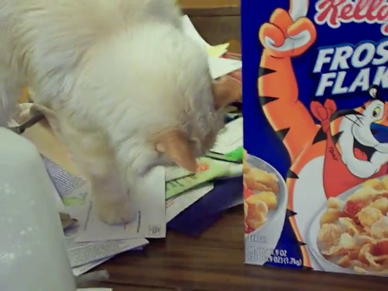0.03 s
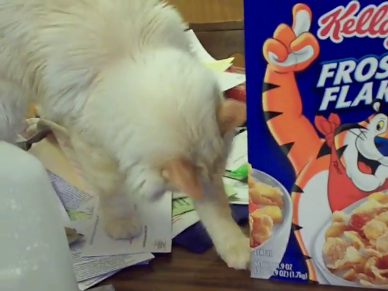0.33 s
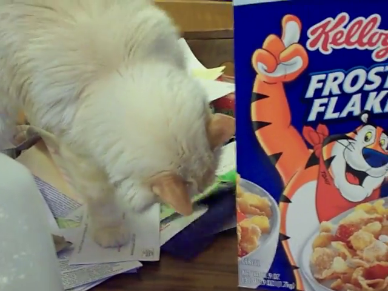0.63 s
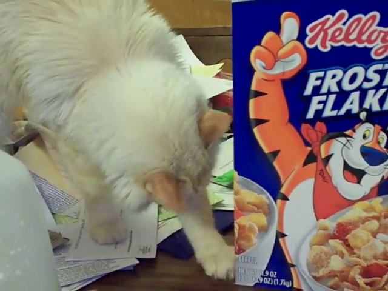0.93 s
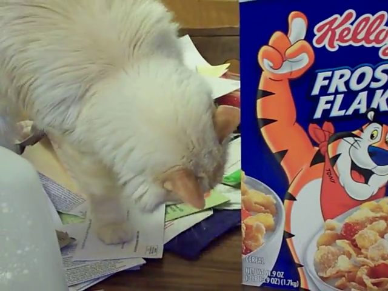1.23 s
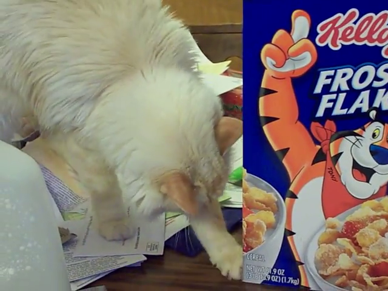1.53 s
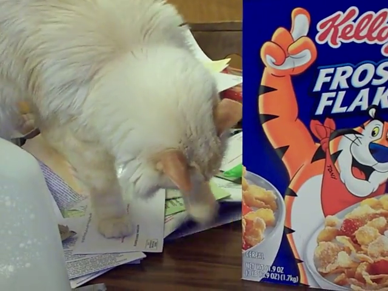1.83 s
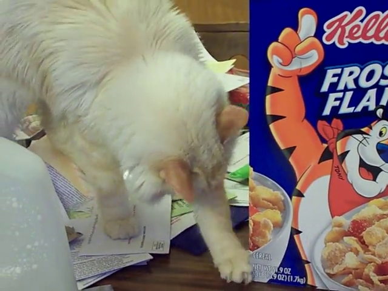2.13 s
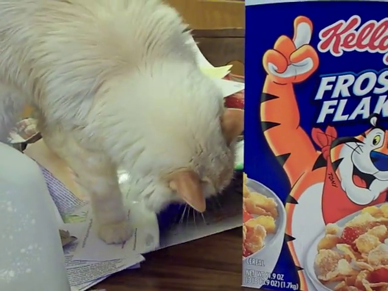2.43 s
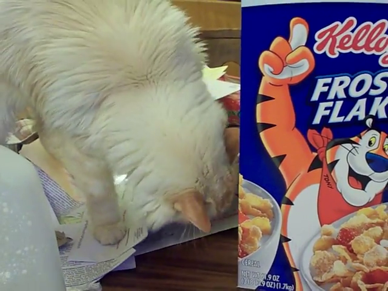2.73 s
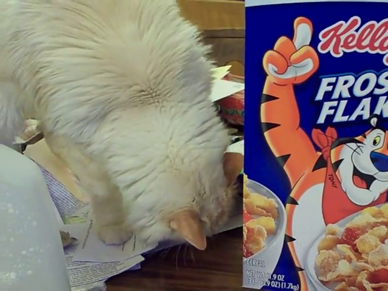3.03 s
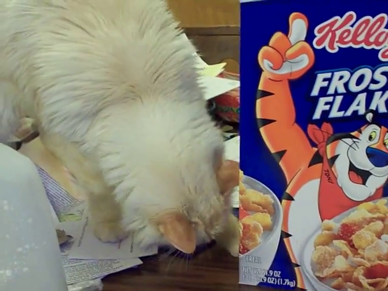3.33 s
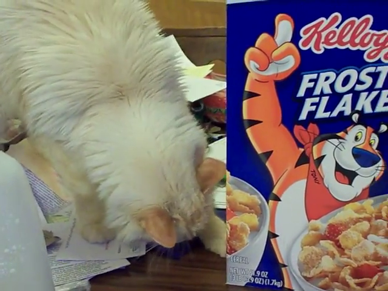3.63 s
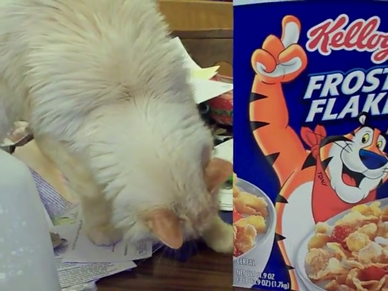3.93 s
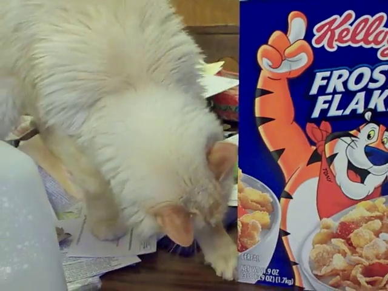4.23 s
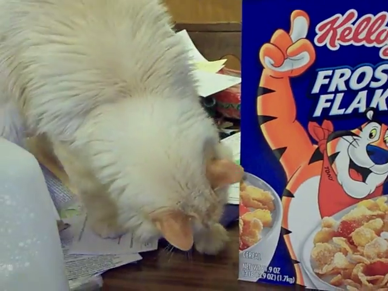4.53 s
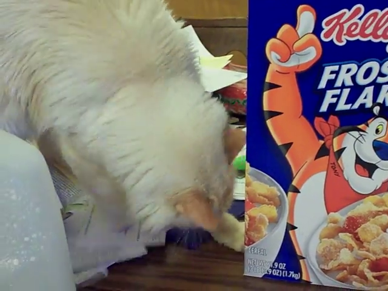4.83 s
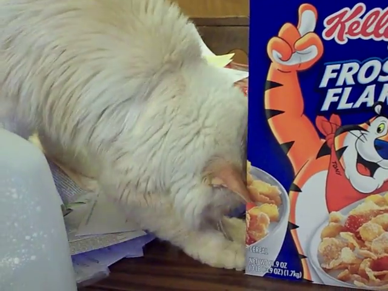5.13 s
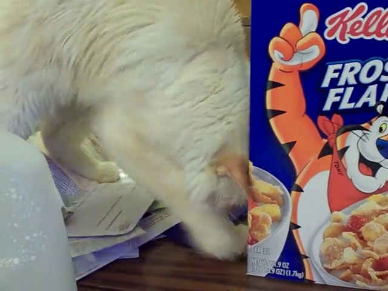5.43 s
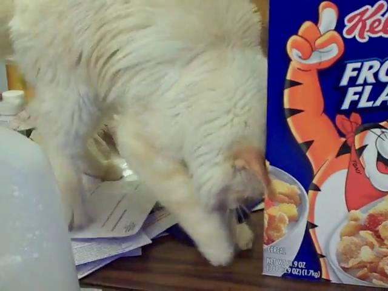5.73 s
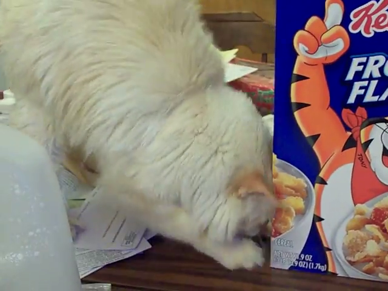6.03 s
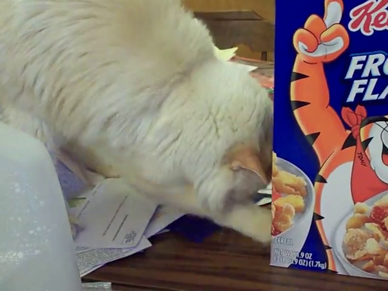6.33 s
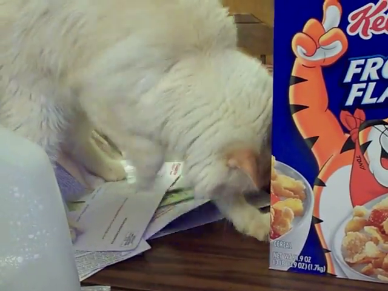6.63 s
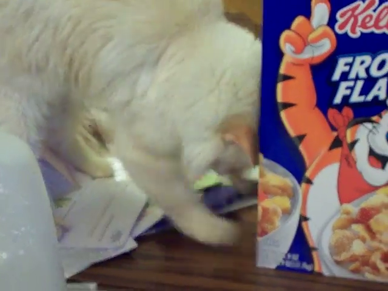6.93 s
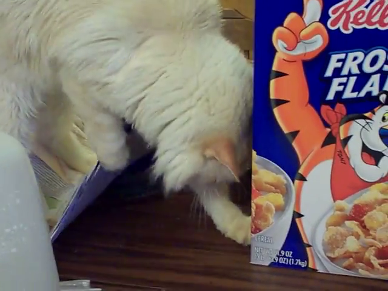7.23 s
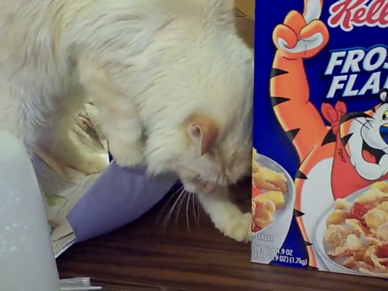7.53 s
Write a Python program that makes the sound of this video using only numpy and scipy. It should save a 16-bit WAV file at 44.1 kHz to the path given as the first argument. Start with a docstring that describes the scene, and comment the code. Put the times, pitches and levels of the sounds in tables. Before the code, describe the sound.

A cat paws at loose papers and an empty cardboard box, with close rustles, taps and soft thuds in a quiet room.

```python
"""A cat paws at loose papers and an empty cardboard box on a wooden desk, close to a small microphone.
Claws tick and knock on the card, jolt the pile and twice squeak; each paw stroke drags a sheet,
creases snap, pads thud on the desk and the box chatters after a bump. The small room answers briefly.
Underneath lie soft room noise, mains hum and a thin electronic whine."""
import sys
import numpy as np
from scipy import signal
from scipy.fft import rfft, irfft
from scipy.io import wavfile

SR = 44100
rng = np.random.default_rng(int(sys.argv[2]) if len(sys.argv) > 2 else 0)


def wrap_up_sound(samples):
    """Save the sound to the file named by the first command line argument, as 16-bit audio."""
    columns = np.atleast_2d(samples).T
    # keep every value between -1 and 1, then stretch to whole-number steps
    tamed = np.clip(columns, -1, 1)
    steps = np.round(tamed * 32767).astype(np.int16)
    wavfile.write(sys.argv[1], SR, steps)


N = 343098
TIME = np.arange(N) / SR

# Claws and paws striking the box. Each row: start in seconds, ring pitch in Hz,
# then the relative levels of knock, claw tick and hollow thud in dB.
BOX_STRIKES = [(0.0591, 1000, -28, -31, -33), (0.2394, 960, -25.5, -62, -43),
               (0.2736, 1840, -27, -35.5, -46), (0.6567, 830, -26.5, -38, -31.5),
               (0.6887, 1515, -25.5, -31, -46), (0.8415, 930, -39, -53, -49), (0.845, 910, -20.5, -54, -34),
               (1.1122, 1750, -41, -67, -58), (1.2062, 910, -33.5, -43, -40), (1.364, 940, -23.5, -58, -20),
               (1.3719, 820, -27, -59, -21.5), (1.4, 740, -30, -67, -30.5), (1.4537, 1670, -18.5, -53, -31),
               (1.5132, 875, -30, -64, -31), (2.0667, 1070, -25, -52, -34), (2.07, 1020, -27, -44, -52),
               (2.0743, 850, -23.5, -47, -55), (2.217, 1260, -32.5, -36.5, -56),
               (2.784, 1000, -44.5, -65, -61), (2.911, 1250, -52, -66, -51),
               (3.333, 1400, -21.5, -36.5, -51), (3.517, 680, -48, -71, -40),
               (4.0501, 820, -36.5, -52, -51), (4.1519, 910, -28.5, -27, -36), (4.1556, 990, -36, -29, -43),
               (4.178, 1340, -21, -59, -33), (4.5005, 1330, -33.5, -57, -49),
               (4.7265, 1420, -18.5, -28.5, -31), (4.9853, 940, -28.5, -43, -56),
               (5.2973, 1570, -12, -18, -46), (5.508, 1200, -15.5, -32.5, -52),
               (5.8283, 1180, -29, -38.5, -37), (5.8817, 2050, -12, -35, -33),
               (5.904, 850, -21.5, -38, -32), (5.9124, 1010, -21, -37, -43),
               (5.9568, 1790, -18, -27.5, -56), (5.9656, 1530, -17, -25.5, -40),
               (6.024, 1990, -26, -27.5, -31.5), (6.1731, 1106, -12, -33, -56),
               (6.264, 1170, -28.5, -44, -60), (6.3802, 1920, -19, -28, -23.5),
               (6.386, 1290, -14, -39, -41), (6.5257, 1370, -12.5, -18, -24.5),
               (6.531, 900, -19.5, -52, -24.5), (6.8292, 1680, -17.5, -23, -37.5),
               (7.007, 1560, -11.5, -17, -27), (7.1923, 876, -32, -33, -30.5),
               (7.2328, 1360, -26, -40, -48), (7.252, 560, -48, -60, -34)]
# Faint rustle under the cat's shifting weight. Each row: time in seconds, level in dB.
FIDGET_RUSTLE = [(0, -59.5), (1.0, -63), (2.2, -60), (2.7, -63), (3.45, -64.5), (3.6, -76.5), (3.88, -75.5),
                 (3.96, -60.5), (4.95, -61), (5.7, -60), (6.15, -67), (6.9, -57.5), (7.75, -62)]


def box_taps(upper_ratio=1.69, soft_pad_gap_db=12.5):
    """Card flexes briefly under each blow, the claw ticks, and the hollow box booms."""
    # Resonances of the empty box. Each row: pitch in Hz, relative level in dB, t60 in seconds.
    box_modes = [(161, -2.5, 0.035), (243, -7, 0.059), (326, -14.5, 0.0067), (378.4, 5, 0.056),
                 (407, 5.5, 0.021)]
    knocks, booms, ticks, cracks, shivers = np.zeros((5, N))
    t = TIME[:SR // 6]
    for start, hz, knock_db, tick_db, thud_db in blows():
        # cycles to the widest swing: fewer for higher and harder blows
        cycles = 0.46 * 0.81 ** np.log2(hz / 1000) * undb(0.02 * (-22.5 - knock_db))
        # a soft pad (tick far under the knock) pushes for longer
        cycles *= 1 + 0.017 * max(knock_db - tick_db - soft_pad_gap_db, 0)
        age = t * hz / cycles
        swell = age * np.exp(1 - age)
        flex = swell * np.sin(2 * np.pi * hz * t)
        flex += undb(-8) * swell ** 2 * np.sin(2 * np.pi * (hz * upper_ratio * t + rng.random()))
        add(knocks, start - .0003, undb(knock_db - 0.34) * flex)
        add(booms, start, undb(thud_db - 3) * ring(box_modes, t, scatter_db=1.5))
        # the claw snaps once, then skids for an instant
        skid = rng.standard_normal(len(t)) * fade(t, t60=0.0084)
        snap = (t == 0) + undb(-4) * skid / np.linalg.norm(skid)
        add(ticks, start + .0003, undb(tick_db + 11) * snap)
        # only a blow that is both sharp and heavy cracks the card itself
        add(cracks, start + .0003, undb(min(tick_db, knock_db - 6) + 8) * snap)
        # the panel's many damped modes shiver on
        add(shivers, start, undb(knock_db - 23) * rng.standard_normal(len(t)) * fade(t, t60=0.08))
    # Four spectra. Each point: frequency in Hz, relative level in dB.
    card = [(150, -12), (520, -4.5), (740, 7.0), (950, 3.0), (1250, 1.5), (1600, -0.5), (2000, 5.0),
            (2400, -0.5), (3000, 2.5), (3600, 3.5), (6000, -0.5)]
    claw = [(500, -23), (2000, -9), (3500, 4.0), (5000, 5.5), (6500, 12), (7600, 7.5), (9000, -17.0)]
    crack = [(120, -14.5), (500, 1.5), (2000, -6), (3300, 2.5), (4500, -1.5), (7000, -20.5)]
    panel = [(200, -12.5), (520, -6.5), (760, 2), (1400, 1), (2100, -5), (3200, -7.5), (5000, -16),
             (9000, -56.5)]
    return (colour(knocks, card) + booms + colour(ticks, claw)
            + colour(cracks, crack) + colour(shivers, panel))


def blows(snap_hz=1690, touch_hz=1200, touch_count=30):
    """Strikes, crease snaps and light chance touches, all as rows like those of BOX_STRIKES."""
    # Paper creases snapping through. Each row: start in seconds, relative level in dB.
    crease_snaps = [(0.094, -30.5), (1.953, -34), (2.1622, -46), (2.4533, -21.5), (2.48, -31),
                    (2.8263, -43), (3.275, -31), (4.5622, -38), (4.873, -41), (6.124, -38), (6.279, -24),
                    (6.5032, -30.5), (7.1411, -22), (7.1604, -22.5), (7.472, -28), (7.4863, -26.5),
                    (7.5662, -32)]
    # a snap also flexes its sheet and stirs the box
    snaps = [(start, snap_hz, db - 6, db, db - 17.5) for start, db in crease_snaps]
    # touches come oftener the more the cat fidgets
    restless = np.cumsum(undb(np.interp(TIME, *np.transpose(FIDGET_RUSTLE))))
    shares = (np.arange(touch_count) + rng.random(touch_count)) / touch_count
    starts = np.interp(shares, restless / restless[-1], TIME)
    touches = [(start, touch_hz * 2 ** (pitch / 2), -42 + 2 * force, -56.5 + 2 * (force + pitch), -59)
               for start, (pitch, force) in zip(starts, rng.uniform(-1.12, 1, (touch_count, 2)))]
    return BOX_STRIKES + snaps + touches


def papers(crease_ceiling_db=-54):
    """Sheets slide in jerks; the same slips shake the sheet and hiss at its surface."""
    # Spectra of the rubbed sheet and its hissing surface. Each row: frequency in Hz, relative level in dB.
    sheet_spectrum = [(90, -16), (170, 2.5), (380, 3.5), (510, -1.5), (760, 4.5), (1000, 4), (1300, 0.5),
                      (1850, 3.5), (2500, -12), (3400, -11.5), (4800, -37), (7000, -54.5)]
    surface_spectrum = [(1200, -42.5), (2500, -1.5), (3500, -6.5), (4800, 0), (5600, 4.5), (6600, 9),
                        (7500, 8), (8300, -3), (9000, -24.5)]
    rub, hiss = sliding()
    judder = unit(undb(2 * walk(150)))
    friction = slips(rate=1800, spread_db=3, smooth_db=-3)
    sheet = colour(friction * judder, sheet_spectrum)
    # as the sheet bends, its ring shifts between low and high
    low = lowpass(sheet, hz=1200)
    bend_db = 2.5 * walk(22)
    sheet = low * undb(bend_db) + (sheet - low) * undb(-bend_db)
    # finer fibres hiss in short scratches that come and go with the grip of the paw
    grip = unit(undb(1.6 * walk(45) + 3 * walk(330)))
    crinkles = slips(rate=260, spread_db=2.5, smooth_db=-19.5)
    fibres = unit(undb(-1) * friction + undb(-3) * crinkles + rng.standard_normal(N)) * judder * grip
    # creases pop at much the same size however fast the sheet moves
    crease_gain = np.minimum(hiss, undb(crease_ceiling_db)) * undb(-7)
    creases = slips(rate=70, spread_db=1.5, smooth_db=-33) * crease_gain
    return sheet * rub + colour(fibres * hiss + creases, surface_spectrum)


def sliding(rise_share=0.49, fall_share=0.71):
    """Strength of the paper's rub and hiss over time: fidgeting, strokes and jolts add up in power."""
    # Paw strokes dragging a sheet. Each row: time of full speed in seconds, nominal length in seconds,
    # rub level in dB, hiss level in dB.
    paw_strokes = [(0.005, 0.026, -54, -45.5), (0.086, .08, -45, -46.5), (0.195, 0.029, -49.5, -51.5),
                   (0.29, 0.029, -59, -67), (0.688, 0.08, -44.5, -46.5), (0.812, 0.053, -51.5, -52),
                   (1.054, 0.064, -62, -62.5), (1.254, 0.038, -45, -47.5), (1.336, 0.082, -57, -55.5),
                   (1.534, 0.1, -60, -57.5), (1.785, 0.037, -51.5, -54.5), (1.947, 0.06, -46.5, -49.5),
                   (2.024, 0.04, -57, -56), (2.298, 0.027, -50.5, -58), (2.456, 0.084, -45.5, -46.5),
                   (3.26, 0.13, -53.5, -53.5), (4.05, 0.075, -49, -52.5), (4.163, 0.052, -43, -50),
                   (4.237, 0.032, -47.5, -48.5), (4.339, .025, -69, -51), (4.56, 0.049, -45.5, -48.5),
                   (4.663, 0.086, -44.5, -52), (4.864, 0.028, -74, -56.5), (5.188, 0.04, -55, -54.5),
                   (5.315, 0.043, -41, -43.5), (5.37, .03, -49.5, -47.5), (5.426, 0.022, -46.5, -49),
                   (5.547, 0.12, -49.5, -57), (5.688, 0.12, -53.5, -57.5), (5.95, 0.16, -49, -50.5),
                   (6.285, 0.041, -60, -48), (6.553, 0.14, -44, -47.5), (6.612, 0.031, -48, -42),
                   (6.721, 0.077, -48, -45), (6.805, 0.048, -45.5, -45.5), (7.035, 0.14, -50, -47),
                   (7.163, 0.11, -47.5, -42), (7.27, 0.072, -50, -53), (7.347, 0.1, -44, -37.5),
                   (7.463, 0.13, -45.5, -39.5), (7.677, 0.04, -50, -41), (7.727, 0.043, -49.5, -43.5)]
    rub_power = undb(np.interp(TIME, *np.transpose(FIDGET_RUSTLE)) - 3.5 * walk(14)) ** 2
    hiss_power = rub_power * undb(-6) ** 2
    t = TIME[:SR // 2]
    for peak, length, rub_db, hiss_db in paw_strokes:
        rise = np.exp(-(t[t < peak] / (rise_share * length)) ** 1.7)[::-1]
        fall = np.exp(-(t / (fall_share * length)) ** 1.58)
        speed = np.concatenate([rise, fall])
        start = peak - len(rise) / SR
        add(rub_power, start, (undb(rub_db) * speed) ** 2)
        add(hiss_power, start, (undb(hiss_db) * speed) ** 2)
    # each strike on the box jolts the pile
    settle = fade(t, t60=0.22)
    for start, _, knock_db, _, _ in BOX_STRIKES:
        add(rub_power, start, (undb(knock_db - 29.5) * settle) ** 2)
        add(hiss_power, start, (undb(knock_db - 37.5) * settle) ** 2)
    return np.sqrt(rub_power), np.sqrt(hiss_power)


def paw_steps(push_s=0.011):
    """Soft pads push the desk top into its lowest modes."""
    # Paws landing on the desk. Each row: start in seconds, level in dB.
    landings = [(.085, -29), (.18, -28.5), (0.634, -28.5), (0.711, -29.5), (0.812, -43), (1.364, -42),
                (1.409, -39), (1.934, -38), (4.151, -26.5), (4.223, -26.5), (5.951, -29.5), (6.014, -30),
                (6.081, -34), (6.524, -28), (6.779, -27), (7.136, -35), (7.182, -40)]
    # Resonances of the desk top. Each row: pitch in Hz, relative level in dB, t60 in seconds.
    desk_modes = [(83.4, -3.5, 0.1), (111.2, -2, 0.14), (160, 0.5, 0.069), (231.4, -3.5, 0.04)]
    out, t = np.zeros(N), TIME[:SR // 4]
    push = 1 - np.exp(-t / push_s)
    for start, db in landings:
        add(out, start, undb(db) * ring(desk_modes, t, scatter_db=-1) * push)
    return out


def box_chatter():
    """After a bump the box chatters dully on the desk until it stands still."""
    rocking_power, t = np.zeros(N), TIME[:SR // 3]
    for start, _, _, _, thud_db in BOX_STRIKES:
        add(rocking_power, start, (undb(thud_db - 19) * fade(t, t60=0.24)) ** 2)
    base_spectrum = [(70, -11.5), (120, -1), (270, -6.5), (420, -1.5), (560, 3), (850, 2.5),
                     (1400, -1.5), (2200, -22.5), (4000, -47)]
    chatter = slips(rate=400, spread_db=0.5, smooth_db=-2)
    return colour(chatter * np.sqrt(rocking_power), base_spectrum)


def claw_squeaks(sag_share=0.09, wobble_share=0.033):
    """Fast stick-slip gives a rough whistle that sags as the claw slows."""
    # A claw on smooth card. Each row: start and length in seconds, opening pitch in Hz, level in dB.
    squeaks = [(0.81, .035, 6040, -50), (4.245, .04, 5900, -52)]
    out = np.zeros(N)
    for start, length, hz, db in squeaks:
        progress = np.linspace(0, 1, int(length * SR))
        pitch = hz * (1 - sag_share * progress + wobble_share * walk(900)[:len(progress)])
        whistle = np.sin(2 * np.pi * np.cumsum(pitch) / SR)
        add(out, start, undb(db) * np.sin(np.pi * progress) * whistle)
    return out


def room(x, echo_s=0.0037, echo_db=-10, wet_db=-9, t60=0.28, build_s=0.0035):
    """A near surface answers at once, then the furnished room dies away; paths change as the cat moves."""
    tail_spectrum = [(100, 3.9), (850, -3.0), (1400, -0.2), (3000, 0.5), (7000, -7.0), (12000, -2.0)]
    t, hop = TIME[:SR // 2], SR // 10
    out = x.copy()
    # each overlapping slice gets its own random tail and echo delay
    for i in range(-hop, N, hop):
        part = x[max(i, 0):i + 2 * hop]
        part = part * signal.windows.hann(2 * hop)[max(-i, 0):][:len(part)]
        start = max(i, 0) / SR
        tail = rng.standard_normal(len(t)) * fade(t, t60) * (1 - np.exp(-t / build_s))
        tail = colour(tail / np.linalg.norm(tail), tail_spectrum)
        add(out, start, undb(wet_db) * signal.fftconvolve(part, tail))
        delay = echo_s * (1 + 0.11 * rng.standard_normal())
        add(out, start + delay, undb(echo_db) * lowpass(part, hz=3000))
    return out


def room_tone(air_db=-51, waver_db=1.47):
    """Low room noise, with mains hum and a thin electronic whine that waver slightly in level."""
    # Spectrum of the still room. Each row: frequency in Hz, relative level in dB.
    air_spectrum = [(20, -3.5), (45, -7.5), (80, -12), (150, -13.5), (270, -23.5), (350, -21), (550, -29.5),
                    (800, -29.5), (1600, -29.5), (2500, -45.5), (4300, -51.5), (6600, -43.5), (8500, -68)]
    # Two hum tones, then two of whine. Each row: pitch in Hz, rms level in dB.
    hum_and_whine = [(59.4, -50.5), (118.8, -67), (7714, -72), (8285, -79)]
    air = colour(rng.standard_normal(N), air_spectrum) * undb(air_db + 0.27 * walk(15))
    tones = np.zeros(N)
    for hz, db in hum_and_whine:
        amplitude = np.sqrt(2) * undb(db + waver_db * walk(4.4))
        tones += amplitude * np.sin(2 * np.pi * (hz * TIME + rng.random()))
    return air + tones


def ring(modes, t, scatter_db):
    """A struck body: each spot shares the blow differently among its modes."""
    hz, db, t60 = np.transpose(modes)[:, :, None]
    strength, polarity, detune = rng.standard_normal((3, len(modes), 1))
    gain = undb(db + scatter_db * strength) * np.sign(polarity)
    waves = np.sin(2 * np.pi * hz * (1 + 0.038 * detune) * t) * fade(t, t60)
    return (gain * waves).sum(0) / np.linalg.norm(gain)


def slips(rate, spread_db, smooth_db):
    """Fibres catch and let go: uneven clicks, about rate a second, over smooth friction noise."""
    slipping = rng.random(N) < rate / SR
    size = undb(spread_db * np.minimum(rng.exponential(size=N), 4))
    clicks = slipping * size * np.sign(rng.standard_normal(N))
    return unit(unit(clicks) + undb(smooth_db) * rng.standard_normal(N))


def colour(x, points, size=8192):
    """Causal filter through (Hz, dB) points, with unit power gain."""
    hz, db = np.transpose(points)
    grid_hz = np.arange(size // 2 + 1) * SR / size
    gain = undb(np.interp(np.log(grid_hz + 1), np.log(hz), db))
    # folding the cepstrum gives minimum phase
    cepstrum = irfft(np.log(gain))
    cepstrum[1:size // 2] *= 2
    cepstrum[size // 2 + 1:] = 0
    response = irfft(np.exp(rfft(cepstrum)))
    return signal.fftconvolve(x, response / np.linalg.norm(response))[:len(x)]


def lowpass(x, hz):
    """Gentle first-order treble cut."""
    return signal.sosfilt(signal.butter(1, hz, fs=SR, output="sos"), x)


def walk(rate):
    """Random drift with spread near 1, turning rate times a second."""
    knots = rng.standard_normal(N // 20)
    return np.interp(TIME * rate, np.arange(len(knots)), knots) * np.sqrt(3 / 2)


def fade(t, t60):
    """Exponential decay by 60 dB in t60 seconds."""
    return np.exp(-np.log(1000) * t / t60)


def add(track, start, sound):
    """Mix a sound into a track at start seconds."""
    i = max(int(start * SR), 0)
    track[i:i + len(sound)] += sound[:max(N - i, 0)]


def undb(db):
    """Decibels to gain."""
    return 10 ** (np.asarray(db) / 20)


def unit(x):
    """Scale to rms 1."""
    return x / np.sqrt(np.mean(x ** 2))


def scene():
    """The cat at work on the desk, heard close up in a small room, in mono."""
    background = room_tone()
    cat = papers() + paw_steps() + box_chatter() + claw_squeaks() + box_taps()
    return (background + room(cat))[None]


def record(dry, notch_hz=4190, notch_width_hz=1200, notch_depth_db=-18, top_hz=8750):
    """The small microphone has a deep notch in the presence range, a faint hiss and no top octave."""
    notched = signal.lfilter(*signal.iirnotch(notch_hz, notch_hz / notch_width_hz, fs=SR), dry)
    notched = notched + undb(notch_depth_db) * (dry - notched)
    hiss = undb(-81) * rng.standard_normal(dry.shape)
    return signal.sosfilt(signal.ellip(9, .2, 70, top_hz, fs=SR, output="sos"), notched + hiss)


dry = scene()
out = record(dry)
wrap_up_sound(out)
```